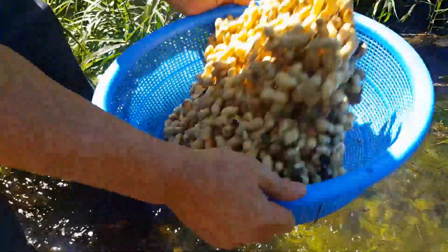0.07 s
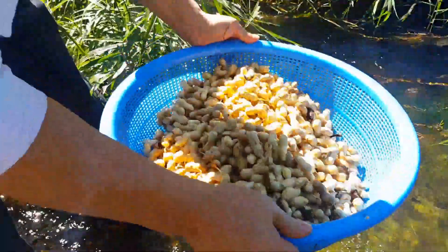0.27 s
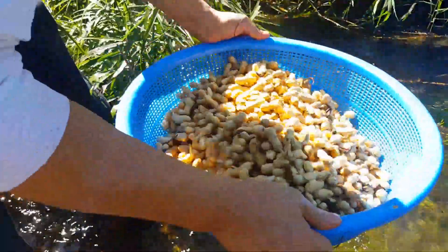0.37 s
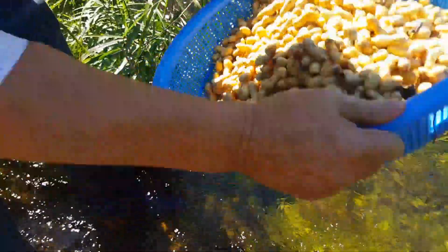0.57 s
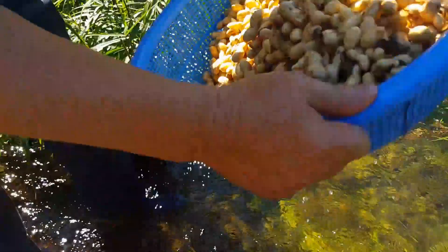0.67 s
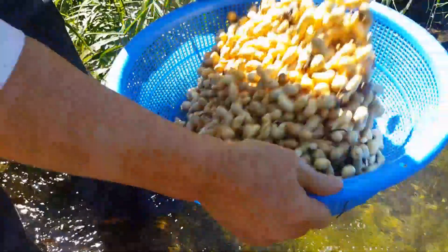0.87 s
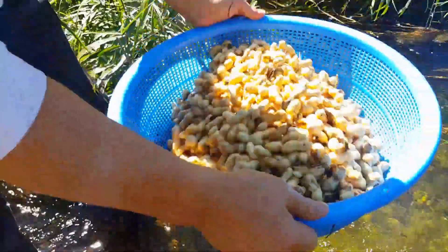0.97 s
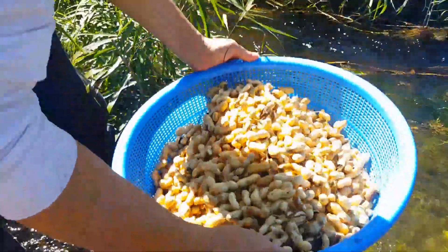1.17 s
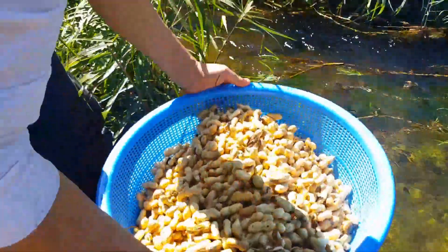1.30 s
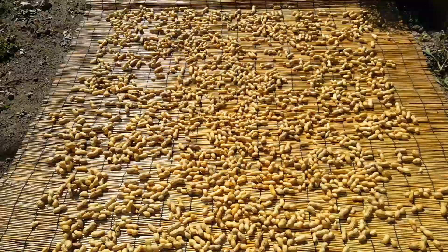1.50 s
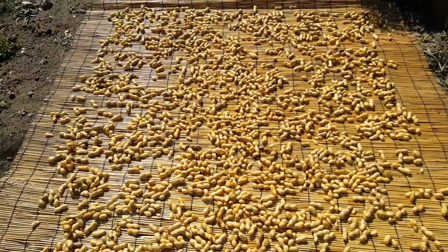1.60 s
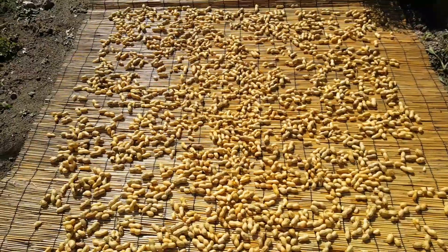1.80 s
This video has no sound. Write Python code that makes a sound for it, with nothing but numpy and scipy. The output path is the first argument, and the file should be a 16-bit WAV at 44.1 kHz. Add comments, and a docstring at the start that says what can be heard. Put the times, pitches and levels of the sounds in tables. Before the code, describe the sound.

Peanuts in their shells are tossed twice in a plastic basket over faint insects and water.

```python
"""Peanuts in their shells are tossed twice in a plastic basket, close by, beside a shallow stream.
Each time they scrape up the wall, rain back in clumps that ring the basket and thud on its floor,
then rattle to rest with tiny shell ticks. Behind them insects hiss in the reeds and the water
trickles, a soft wash dotted with rising bubbles. After one low bump, all sound stops abruptly."""
import sys
import numpy as np
from scipy import signal
from scipy.fft import rfft, irfft
from scipy.io import wavfile
from scipy.ndimage import uniform_filter1d

SR = 44100
rng = np.random.default_rng(int(sys.argv[2]) if len(sys.argv) > 2 else 0)


def pcm_store(signal):
    """Save signal as 16-bit PCM."""
    levels = np.round(np.clip(np.atleast_2d(signal), -1, 1) * 32767)
    wavfile.write(sys.argv[1], SR, levels.astype(np.int16).T)


N = 81585

# Envelope and hit levels are relative, ahead of each layer's EQ and trim.
# nuts raining down, one envelope per toss: time_s, level_db
LANDING_ENVELOPES = [
    [(0.185, -47), (0.234, -41), (0.25, -32), (0.275, -24), (0.305, -20), (0.338, -24.5), (0.383, -38.5),
     (0.40, -25), (0.425, -32.5), (0.46, -28), (0.51, -39.5), (0.62, -56)],
    [(0.975, -47), (1.025, -28.5), (1.052, -17), (1.078, -18), (1.085, -36), (1.106, -24.5), (1.135, -25.5),
     (1.19, -27), (1.215, -33.5), (1.3, -48.5), (1.44, -48.5)],
]
# clumps that land together: start_s, level_db
CLUMP_HITS = [(0.244, -22), (0.260, -21), (0.287, -16), (0.304, -19), (0.329, -17), (0.339, -17),
              (0.361, -13), (0.391, -15.5), (0.403, -23), (1.045, -28), (1.059, -19.5), (1.074, -15.5),
              (1.104, -19.5), (1.119, -30.5), (1.151, -18.5), (1.168, -22), (1.189, -24), (1.254, -28),
              (1.296, -29.5), (1.334, -33)]
# resonances of the loaded basket: pitch_hz, bandwidth_hz, gain_db, left_minus_right_db
BASKET_MODES = [(247, 30, -8, 0), (301, 30, -12, 0), (467, 25, -8, 0), (615, 25, -7.5, -2),
                (808, 25, -2, -1), (1057, 30, -2.5, 4), (1148, 30, -3, 5), (1250, 45, -4.5, 2.5),
                (1477, 30, -6, 1), (1588, 35, -7, 3.5), (1797, 60, -12, 0), (1950, 100, -8, 2),
                (2425, 70, -11, 2), (2805, 60, -15, 1)]
# dull knock of a landing nut: frequency_hz, gain_db
KNOCK_EQ = [(50, -56), (110, -14), (190, -2), (350, -3.5), (550, 4), (950, -3), (1400, 0), (2200, -3.5),
            (3200, -16), (5000, -26.5), (9000, -43), (15000, -49)]
# the load sliding up the wall: peak_s, rise_s, fall_s, level_db
SLIDE_SWELLS = [(0.17, 0.024, 0.019, -29.5), (0.928, 0.021, 0.027, -33.5)]
# midrange scrape of the slide: frequency_hz, gain_db
SLIDE_EQ = [(80, -22), (230, -4.5), (450, -0.5), (850, 0.5), (1600, -1.5), (2500, -11), (4000, -17),
            (8000, -27), (15000, -26.5)]
# the bulk of the load hitting the basket floor: start_s, level_db
THUD_HITS = [(0.308, -25), (0.326, -20), (0.358, -24.5), (0.391, -31.5), (1.052, -29), (1.102, -27.5)]
# low body of the floor: frequency_hz, gain_db
THUD_EQ = [(50, -25.5), (110, -20.5), (170, -11), (250, 11.5), (340, -4), (470, -0.5), (700, -18.5),
           (1500, -35)]
# the heap shifting and settling, one envelope per toss: time_s, level_db
SETTLING_ENVELOPES = [
    [(0.238, -32), (0.26, -30), (0.33, -23), (0.383, -34), (0.395, -22.5), (0.45, -43.5), (0.495, -32.5),
     (0.585, -44), (0.63, -48)],
    [(1.02, -49.5), (1.07, -40), (1.11, -20), (1.135, -27.5), (1.175, -22.5), (1.213, -32.5), (1.27, -40),
     (1.345, -45), (1.40, -56)],
]
# hollow resonances of the heap: pitch_hz, bandwidth_hz, gain_db, left_minus_right_db
HEAP_MODES = [(740, 90, -7, -1), (808, 48, 0, -1.5), (862, 60, -5, -2), (915, 55, -5, -2)]
# shells ticking together, one envelope per toss: time_s, level_db
TICK_ENVELOPES = [
    [(0.23, -52.5), (0.29, -40), (0.335, -39), (0.39, -40), (0.46, -38.5), (0.525, -49.5), (0.56, -53),
     (0.68, -57)],
    [(1.0, -52), (1.05, -42), (1.10, -37.5), (1.165, -42), (1.192, -36.5), (1.225, -41.5), (1.31, -49.5),
     (1.45, -62.5)],
]
# single shell clicks that stand out: start_s, level_db
CLICK_HITS = [(0.305, -30), (0.389, -27.5), (0.418, -43), (0.521, -38), (0.535, -39), (1.011, -43.5),
              (1.096, -29.5), (1.107, -35.5), (1.136, -28.5), (1.302, -32.5)]
# bright snap of shell on shell: frequency_hz, gain_db
SHELL_EQ = [(500, -17.5), (1800, 6.5), (3500, 4.5), (5500, 2), (8000, -3), (11000, -4.5), (13500, -3.5),
            (15500, -5.5)]
# stereo spread of nuts and basket: frequency_hz, side_minus_mid_db
BASKET_WIDTH = [(60, -16), (200, -22.5), (400, -15), (750, -10.5), (1300, -1.5), (2400, -3.5), (4400, 0.5),
                (15000, -0.5)]
# swell of the insect chorus: time_s, level_db
INSECT_ENVELOPE = [(0, -45), (.07, -43.5), (.24, -46.5), (.56, -45.5), (.7, -44.5), (.84, -43.5),
                   (.92, -45.5), (1.15, -43.5), (1.38, -44.5), (1.43, -46), (1.57, -43.5), (1.62, -45)]
# narrow, high band of the insects: frequency_hz, gain_db
INSECT_EQ = [(5000, -45.5), (6400, -24.5), (7100, -10), (7700, -3.5), (8100, -1), (8550, -5), (9200, -17),
             (11000, -37)]
# wash of the water: frequency_hz, gain_db
STREAM_EQ = [(25, -13), (60, -3.5), (130, -7.5), (230, 2.5), (380, 0), (800, -0.5), (1300, -7.5),
             (2400, -7), (3200, -13.5), (5500, -19), (11000, -15.5), (15500, -26)]
# stereo spread of the wash: frequency_hz, side_minus_mid_db
WASH_WIDTH = [(60, -12), (220, -13), (400, -4), (750, 2), (1300, 7.5), (3000, -1), (15000, 1.5)]
# the clearest bubbles: start_s, pitch_hz, level_db
STREAM_PLOPS = [(0.035, 425, -43.5), (0.669, 700, -35), (0.682, 984, -38.5), (0.742, 1800, -37),
                (0.862, 434, -41), (1.462, 708, -39.5), (1.544, 1122, -38.5), (1.558, 2340, -40)]

KNOCKS_PER_S, RATTLES_PER_S, TICKS_PER_S = 2400, 450, 2600
RING_TRIM_DB, KNOCK_TRIM_DB, RATTLE_TRIM_DB = -2.5, -5.5, 2
CONTACT_HZ = 3940  # contacts are soft, so the ringing rolls off above this
WASH_TRIM_DB, BUBBLE_DB, BUBBLE_SPREAD_DB, BUBBLE_PAN_DB = -48, -50.5, 10, 9.5
STOP_S, STOP_FADE_S, HIGH_CUT_HZ = 1.63, 0.0054, 15800


def landings():
    """Nuts rain down, singly and in clumps; each knocks dully and rings the basket."""
    envelope = sum(curve(toss) for toss in LANDING_ENVELOPES)
    rain = envelope * impacts(KNOCKS_PER_S, scatter_db=4.5, window=300)
    clumps = bursts(CLUMP_HITS, decay_s=0.0032) * impacts(per_s=5000, scatter_db=0, window=200)
    hits = rain + clumps
    ringing = ring(hits, BASKET_MODES)
    knocks = stereo(colour(scatter(hits), KNOCK_EQ), BASKET_WIDTH)
    return undb(RING_TRIM_DB) * ringing + undb(KNOCK_TRIM_DB) * knocks


def slides():
    """Shells scrape up the mesh in a short swell of fine contacts."""
    t = np.arange(N) / SR
    swell = sum(undb(db) * np.exp(-np.abs(t - peak_s) / np.where(t < peak_s, rise_s, fall_s))
                for peak_s, rise_s, fall_s, db in SLIDE_SWELLS)
    contacts = swell * impacts(per_s=3700, scatter_db=3, window=500)
    return stereo(colour(scatter(contacts), SLIDE_EQ), BASKET_WIDTH)


def thuds():
    """The weight of the load makes the basket floor thud."""
    blows = bursts(THUD_HITS, decay_s=0.0094) * rng.standard_normal((2, N))
    return stereo(colour(blows, THUD_EQ), BASKET_WIDTH)


def settling():
    """Nuts tumble over the heap with a hollow rattle."""
    envelope = sum(curve(toss) for toss in SETTLING_ENVELOPES)
    tumbles = envelope * impacts(RATTLES_PER_S, scatter_db=3, window=700)
    return undb(RATTLE_TRIM_DB) * ring(tumbles, HEAP_MODES)


def shell_ticks():
    """Crisp little shell contacts build with each landing and die away, a little to the right."""
    envelope = sum(curve(toss) for toss in TICK_ENVELOPES)
    contacts = envelope * impacts(TICKS_PER_S, scatter_db=2.0)
    return pan(db=-3.5) * stereo(colour(scatter(contacts), SHELL_EQ), BASKET_WIDTH)


def shell_clicks():
    """A few shells crack against each other more sharply than the rest."""
    cracks = bursts(CLICK_HITS, decay_s=0.0045) * rng.standard_normal((2, N))
    return colour(cracks, SHELL_EQ)


def insects(flutter_db=0.7, flutter_per_s=350):
    """Many insects blend into one high, fluttering band, a little to the left."""
    flutter = undb(flutter_db * np.array([wander(flutter_per_s), wander(flutter_per_s)]))
    hiss = colour(flutter * rng.standard_normal((2, N)), INSECT_EQ)
    return pan(db=2) * curve(INSECT_ENVELOPE) * hiss


def stream(bubble_count=520, low_hz=450, high_hz=2700, ripple_db=1.5):
    """Running water: a soft wash, many small bubbles and a few clear plops."""
    ripples = rng.standard_normal((2, N)) * undb(ripple_db * wander(per_s=40))
    wash = stereo(colour(ripples, STREAM_EQ), WASH_WIDTH)
    water = undb(WASH_TRIM_DB) * wash * pan(db=-2.0)
    small_bubbles = [
        (when * N / SR, low_hz * (high_hz / low_hz) ** pitch, BUBBLE_DB + BUBBLE_SPREAD_DB * (loud - .5))
        for when, pitch, loud in rng.random((bubble_count, 3))]
    for start_s, pitch_hz, db in small_bubbles + STREAM_PLOPS:
        start = int(start_s * SR)
        plop = undb(db) * bubble(pitch_hz)[:N - start]
        water[:, start:start + len(plop)] += pan(BUBBLE_PAN_DB * rng.uniform(-0.86, 1)) * plop
    return water


def bubble(pitch_hz, decay_cycles=6.3, glide=0.04, samples=5000):
    """A bubble rings briefly, rising in pitch as it fades."""
    cycles = np.arange(samples) / SR * pitch_hz
    age = cycles / decay_cycles
    envelope = np.exp(-age) * (1 - np.exp(-cycles))
    return envelope * np.sin(2 * np.pi * cycles * (1 + glide * age / 2))


def bump(centre_s=1.597, pitch_hz=96, width_s=0.006, gain_db=-47.5):
    """One soft, low bump just before the end."""
    t = np.arange(N) / SR - centre_s
    return undb(gain_db) * np.exp(-(t / width_s) ** 2) * np.sin(2 * np.pi * pitch_hz * t)


def impacts(per_s, scatter_db, window=1100):
    """Random contacts of uneven strength, their power evened out over `window` samples."""
    chance, strength = rng.random(N), rng.standard_normal(N)
    hits = (chance < per_s / SR) * undb(scatter_db * np.clip(strength, -2, 2))
    power = np.maximum(uniform_filter1d(hits ** 2, window), 0)
    return hits / np.sqrt(power + np.mean(power) / 20 + 1e-18)


def scatter(hits):
    """Every contact lands somewhere else: its own polarity in mid and side."""
    return hits * np.sign(rng.standard_normal((2, N)))


def ring(hits, modes, samples=6000):
    """Contacts excite damped modes, each according to where they land."""
    t = np.arange(samples) / SR
    ringing = 0
    for pitch_hz, bandwidth_hz, db, pan_db in modes:
        mode = np.exp(-np.pi * bandwidth_hz * t) * np.cos(2 * np.pi * pitch_hz * t)
        struck = convolve(scatter(hits), mode / np.linalg.norm(mode))
        ringing = ringing + undb(db) * pan(pan_db) * stereo(struck, BASKET_WIDTH)
    low_cut_hz = modes[0][0] / 2  # an octave under the lowest mode
    band = signal.butter(2, [low_cut_hz, CONTACT_HZ], "band", fs=SR, output="sos")
    mode_gains = undb(np.array(modes)[:, 2])
    return signal.sosfilt(band, ringing) / np.linalg.norm(mode_gains)


def bursts(rows, decay_s):
    """Envelope of hits that start at once and die away."""
    t = np.arange(N) / SR
    return sum(undb(db) * (t >= start_s) * np.exp(-np.abs(t - start_s) / decay_s) for start_s, db in rows)


def curve(rows):
    """Fader ride through time_s, level_db points, silent outside them."""
    time_s, db = np.array(rows).T
    return undb(np.interp(np.arange(N) / SR, time_s, db, left=-120, right=-120))


def wander(per_s):
    """Random drift that glides to a new value `per_s` times a second."""
    knots = rng.standard_normal(4096)
    return np.interp(np.arange(N) / SR * per_s, np.arange(len(knots)), knots)


def colour(sound, eq):
    """Shape the tone with an EQ that keeps the power of white noise."""
    impulse = response(eq)
    return convolve(sound, impulse / np.linalg.norm(impulse))


def response(eq, samples=4096):
    """Minimum-phase impulse response through frequency_hz, gain_db points."""
    hz, db = np.array(eq).T
    bin_hz = np.arange(samples // 2 + 1) * SR / samples
    gain = undb(np.interp(np.log(bin_hz + 1), np.log(hz), db))
    cepstrum = irfft(np.log(gain))[:samples // 2]
    cepstrum[1:] *= 2  # nothing rings ahead of the hit
    return irfft(np.exp(rfft(cepstrum, samples)))


def convolve(sound, impulse):
    """Pass each channel through an impulse response."""
    return signal.fftconvolve(sound, impulse[None], axes=1)[:, :N]


def stereo(mid_side, width):
    """Mid and side to left and right, the side weighted by frequency."""
    mid = mid_side[0]
    side = convolve(mid_side[1:], response(width))[0]
    return np.array([mid + side, mid - side])


def pan(db):
    """Channel gains for a left-minus-right level difference."""
    return undb(np.array([[db], [-db]]) / 2)


def undb(db):
    """Decibels to gain."""
    return 10 ** (np.asarray(db) / 20)


def scene():
    """The two tosses up front, over a bed of insects and water."""
    peanuts = slides() + landings() + thuds() + settling() + shell_ticks() + shell_clicks()
    return peanuts + insects() + stream() + bump()


def record(dry):
    """The mix stops abruptly; a steep high cut takes off the very top."""
    gate = np.clip((STOP_S - np.arange(N) / SR) / STOP_FADE_S, 0, 1)
    high_cut = signal.ellip(10, .2, 80, HIGH_CUT_HZ, fs=SR, output="sos")
    return signal.sosfilt(high_cut, dry * gate)


dry = scene()
out = record(dry)
pcm_store(out)
```